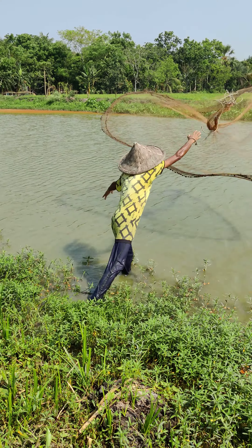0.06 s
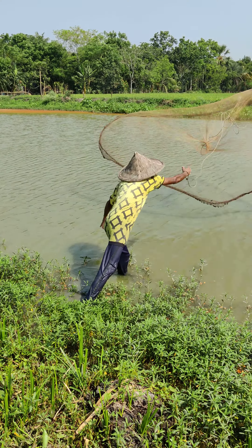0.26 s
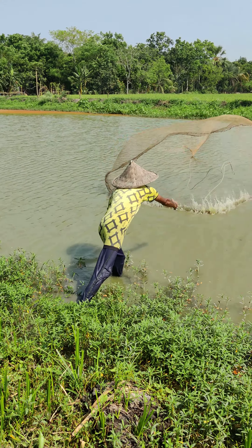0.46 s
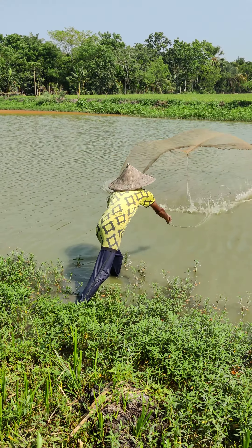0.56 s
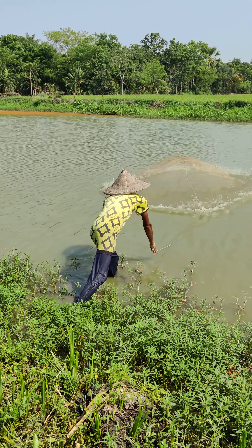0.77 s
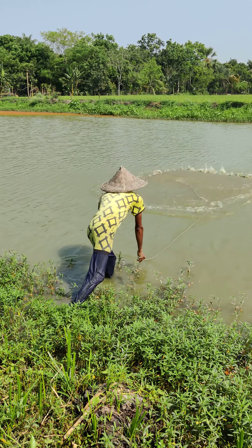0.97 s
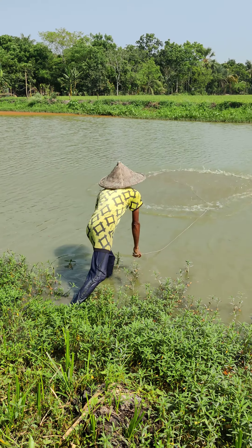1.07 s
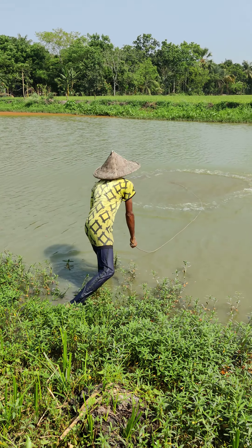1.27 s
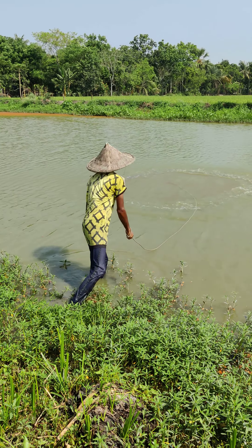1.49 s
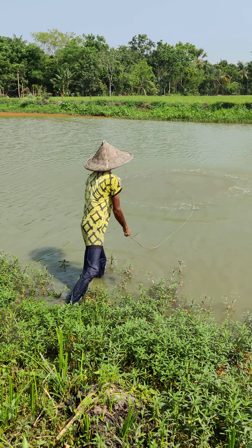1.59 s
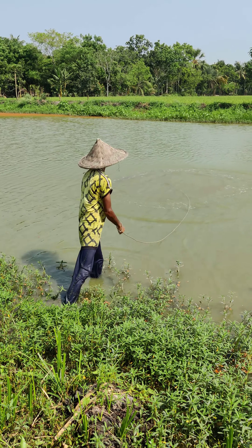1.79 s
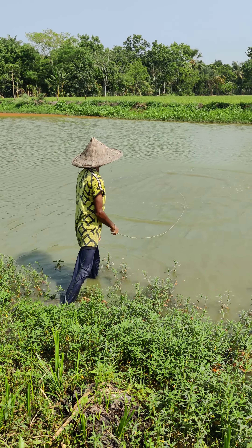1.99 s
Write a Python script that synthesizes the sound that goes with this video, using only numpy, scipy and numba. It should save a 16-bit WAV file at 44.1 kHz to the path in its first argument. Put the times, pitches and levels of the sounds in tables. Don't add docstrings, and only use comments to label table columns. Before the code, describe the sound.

A weighted cast net slaps onto pond water with a fizzing splash, wind thumping the microphone

```python
import sys
import numpy as np
from scipy import signal
from scipy.fft import rfft, irfft
from scipy.io import wavfile
from scipy.ndimage import uniform_filter1d
from numba import njit

SR = 44100
rng = np.random.default_rng(int(sys.argv[2]) if len(sys.argv) > 2 else 0)


def wrap_up_sound(samples):
    columns = np.atleast_2d(samples).T
    tamed = np.clip(columns, -1, 1)
    steps = np.round(tamed * 32767).astype(np.int16)
    wavfile.write(sys.argv[1], SR, steps)


def invert_db(x):
    u = np.asarray(x, float) / 20
    return 10 ** u


N = 90404
GLIDE = 0.17


def unit(x):
    return x / np.sqrt(np.mean(x ** 2))


@njit
def lowpass(x, edge_hz):
    y, band, low = np.empty(len(x)), 0., 0.
    for i in range(len(x)):
        g = np.tan(np.pi * edge_hz[i] / SR)
        v = (band + g * (x[i] - low)) / (1 + g * (g + 1.4))
        y[i] = low + g * v
        band, low = 2 * v - band, low + 2 * g * v
    return y


@njit
def ring(n, start, hz, cycles, size, glide, swell):
    y = np.zeros(n)
    for k in range(len(start)):
        span = int(cycles[k] * SR / hz[k])
        phase = 0.
        for j in range(min(2 * span, n - start[k])):
            now_hz = min(hz[k] * (1 + glide * j / span), .45 * SR)
            phase += 2 * np.pi * now_hz / SR
            attack = min(j / (swell * span + 1), 1.)
            y[start[k] + j] += size[k] * np.exp(-3. * j / span) * attack * np.sin(phase)
    return y


def colour(x, points, lag_s=0.):
    f, p = np.fft.rfftfreq(2048, 1 / SR), np.array(points, float)
    gain_db = np.interp(np.log(f + 1), np.log(p[:, 0]), p[:, 1])
    cepstrum = irfft(gain_db * np.log(10) / 20)
    cepstrum[1:1024] *= 2
    cepstrum[1025:] = 0
    impulse = irfft(np.exp(rfft(cepstrum) - 2j * np.pi * f * lag_s))
    return signal.fftconvolve(x, impulse)[:N]


def walk(rate_hz):
    k = int(SR / rate_hz)
    steps = rng.standard_normal(400)[np.arange(N) // k % 400]
    return 1.31 * uniform_filter1d(uniform_filter1d(steps, k), k)


def curve(table, col):
    p = np.array(table, float)
    return np.interp(np.arange(N) / SR, p[:, 0], p[:, col])


def swarm(per_s, cycles, scatter_db, mid_hz, octaves):
    c = rng.random((12000, 4))[:int(per_s * N / SR)].T
    start = (c[0] * N).astype(np.int64)
    hz = np.clip(mid_hz * 2 ** (octaves * (c[1] + c[2] - 1) * 2), 120, 15000)
    size = invert_db(-scatter_db * np.log(c[3] + 1e-4))
    return unit(ring(N, start, hz, cycles * (.5 + c[2]), size, GLIDE, 0.))


def singles(table, cycles, gain_db, swell=0.):
    p = np.array(table, float)
    start = (p[:, 0] * SR).astype(np.int64)
    return ring(N, start, p[:, 2].copy(), cycles + 0 * p[:, 0], invert_db(p[:, 1] + gain_db), GLIDE, swell)


# pitch_hz, level_db
FIELD_COLOUR = [(60, -8), (200, 17.5), (500, 12), (1500, 5.5), (5000, -1.5), (11000, 6.5), (13600, 1),
                (14600, -22), (15500, -22)]


def field():
    level_db, shared = -56.5, 0.38
    mid, left, right = (colour(rng.standard_normal(N), FIELD_COLOUR) for _ in range(3))
    return invert_db(level_db) * (np.sqrt(shared) * mid + np.sqrt(1 - shared) * np.array([left, right]))


# centre_s, half_length_s, depth_db
WIND_LULLS = [
    (0.186, 0.11, -10.5),
    (1.38, 0.018, -9),
]


def rumble(level_db, edge_hz):
    t = np.arange(N) / SR
    lull_db = sum(db * np.exp(-((t - s) / half) ** 2) for s, half, db in WIND_LULLS)
    noise = lowpass(rng.standard_normal(N), np.full(N, 1. * edge_hz))
    noise = lowpass(noise, np.full(N, 0.74 * edge_hz))
    return unit(noise) * invert_db(level_db + lull_db + 5.6 * walk(27.16))


def eddies(table):
    t, out = np.arange(N) / SR, np.zeros(N)
    for row, c in zip(table, rng.random((60, 2))):
        u = (t - row[0]) * row[2] * 2.884
        push = (1 - 2 * u ** 2 + (c[1] - .5) * u) * np.exp(-u ** 2)
        out += np.sign(c[0] - .5) * invert_db(row[1]) * push
    return out


# centre_s, peak_db, size_hz, flutter_db
LEFT_PORT_EDDIES = [(0.015, -18.5, 45, -39.5), (0.076, -29.5, 35.3, -45.5), (0.101, -30, 59.6, -62),
                    (0.311, -38, 79.4, -52), (0.35, -27, 41.5, -52), (0.39, -20.5, 45.7, -43.5),
                    (0.431, -8, 46.5, -35), (0.483, -27.5, 65, -45), (0.53, -21, 61.3, -39),
                    (0.621, -47, 79.4, -45), (0.666, -52, 65, -52), (0.754, -17.5, 45, -34.5),
                    (0.77, -12.5, 81, -39.5), (0.788, -9.5, 63.7, -31), (0.815, -49, 38, -37),
                    (0.873, -36, 61, -42.5), (0.916, -23, 45, -41), (0.95, -12, 33, -35),
                    (1.007, -17.5, 59, -36.5), (1.037, -20.5, 45, -50), (1.047, -13.5, 96, -31),
                    (1.07, -15.5, 110, -29), (1.087, -22, 85, -31), (1.112, -24.5, 64.5, -37.5),
                    (1.162, -19.5, 104, -32), (1.184, -33, 89, -34.5), (1.209, -20, 64, -53),
                    (1.24, -17.5, 57.6, -37.5), (1.274, -37, 55, -44), (1.299, -16.5, 45, -47),
                    (1.318, -28.5, 87, -36), (1.336, -18, 34.2, -61), (1.423, -25, 47.4, -46.5),
                    (1.457, -11, 58, -37), (1.48, -14.5, 37.8, -36.5), (1.496, -12.5, 94, -33.5),
                    (1.509, -16, 66.6, -34.5), (1.55, -6.5, 130, -27), (1.576, -11.5, 57, -41),
                    (1.593, -13.5, 34.4, -39), (1.604, -23, 140, -35), (1.619, -10, 116, -29.5),
                    (1.631, -13, 57, -27.5), (1.65, -13, 67, -35), (1.686, -17.5, 54.6, -38),
                    (1.708, -16, 82, -36), (1.76, -12.5, 35.3, -50), (1.775, -10, 43, -33.5),
                    (1.791, -10.5, 52.6, -35.5), (1.822, -17, 89, -29.5), (1.836, -13.5, 38, -37),
                    (1.87, -21, 25.8, -56), (1.9, -22, 68.6, -38), (1.935, -27, 50, -39),
                    (1.976, -25.5, 45, -44.5)]


def left_gusts():
    flutter_s, gain_db, mid_hz, oct_per_db = .012, 7, 183.4, .045
    t = np.arange(N) / SR
    power = sum(invert_db(2 * db) * np.exp(-((t - s) / flutter_s) ** 2) for s, _, _, db in LEFT_PORT_EDDIES)
    gust_db = 10 * np.log10(power + invert_db(-120)) + 1.5 * walk(60.57)
    edge_hz = np.clip(mid_hz * 2 ** (oct_per_db * (gust_db + 30)), 40, 600)
    fine = rng.standard_normal(N)
    fine = fine - lowpass(fine, np.full(N, 50.))
    fine = lowpass(lowpass(fine, edge_hz), 0.97 * edge_hz)
    fine = fine * np.sqrt(SR / 2 / edge_hz)
    return eddies(LEFT_PORT_EDDIES) + fine * invert_db(gust_db + gain_db)


# centre_s, peak_db
RIGHT_PORT_EDDIES = [(0.058, -26), (0.114, -32), (0.223, -26), (0.343, -35), (0.393, -34), (0.47, -31),
                     (0.591, -28), (0.646, -28), (0.681, -35), (0.71, -30), (1.205, -36), (1.508, -33),
                     (1.565, -25), (1.594, -32), (1.641, -32), (1.712, -27)]


def wind():
    size_hz = 32
    right = [(s, db, size_hz) for s, db in RIGHT_PORT_EDDIES]
    return np.array([left_gusts() + rumble(-30, 50), eddies(right) + rumble(-36.5, 45)])


# time_s, level_db
SWISH_LEVEL = [
    (0, -41.5),
    (.03, -67),
    (.085, -63),
    (.11, -69),
    (.16, -61.5),
    (.26, -62.5),
    (.4, -63.5),
    (.45, -99),
]


def swish():
    tone = [(150, 35.5), (400, 21), (1200, 5.5), (5000, -5), (8500, 17), (12000, 8.5), (15000, 1)]
    return colour(rng.standard_normal(N), tone) * invert_db(curve(SWISH_LEVEL, 1) + walk(47))


def drops(table, pitch_hz, cycles, gain_db):
    tick_hz, tick_db = 11200, -10
    c = rng.standard_normal((40, 2))
    rings = [(s, db, pitch_hz * (1 + 0.056 * v[0])) for (s, db), v in zip(table, c)]
    ticks = [(s, db, tick_hz * (1 + .1 * v[1])) for (s, db), v in zip(table, c)]
    return singles(rings, cycles, gain_db) + singles(ticks, 2.8, gain_db + tick_db)


# start_s, peak_db
FLIGHT_DROPS = [(0.0034, -40), (0.0134, -40), (0.0234, -47), (0.0294, -49), (0.0533, -46), (0.0604, -45),
                (0.1094, -51), (0.1436, -46), (0.1514, -47), (0.1955, -51), (0.2074, -51), (0.2458, -46),
                (0.2723, -39), (0.2907, -47), (0.3346, -46), (0.3576, -45)]


def net_drops():
    return drops(FLIGHT_DROPS, pitch_hz=5760, cycles=10, gain_db=8)


# start_s, peak_db
WATER_DROPS = [(0.407, -27), (0.4364, -24), (0.4753, -26), (1.045, -33), (1.0779, -35), (1.1194, -34),
               (1.1972, -41), (1.2456, -42), (1.3334, -48), (1.4112, -44), (1.4287, -47), (1.7305, -48)]


def pond_drops():
    return drops(WATER_DROPS, pitch_hz=4870, cycles=30, gain_db=-1)


# start_s, peak_db, pitch_hz
LARGE_BUBBLES = [(0.52, -28, 708), (0.542, -28, 697), (0.562, -29, 835), (0.58, -37, 940),
                 (0.609, -27.5, 702), (0.671, -28.5, 647), (0.787, -23.5, 806), (0.818, -31.5, 860),
                 (0.865, -29.5, 654), (0.88, -30, 1140), (1.129, -35, 1240), (1.264, -37.5, 723),
                 (1.318, -46, 580), (1.447, -39.5, 824)]


def bubbles():
    return singles(LARGE_BUBBLES, cycles=17.5, gain_db=1, swell=.12)


# start_s, peak_db, pitch_hz
AIR_GULPS = [
    (.50, -28, 227),
    (.535, -23.5, 215),
    (.675, -28, 301),
    (.79, -26, 342),
    (.86, -29.5, 340),
    (1.0, -29, 298),
    (1.448, -33.5, 481.5),
]


def gulps():
    return singles(AIR_GULPS, cycles=9.9, gain_db=0, swell=0.21)


# start_s, peak_db, pitch_hz
WEIGHT_SLAPS = [
    (.4068, -30, 3670),
    (.4075, -35, 5400),
    (.7515, -33, 4300),
    (.763, -29, 4450),
    (.771, -27, 3820),
]


def slaps():
    return singles(WEIGHT_SLAPS, cycles=17, gain_db=0)


# time_s, spray_db, big_bubble_db, fine_mist_db
RIM_SPRAY = [
    (0.406, -62, -24, 16),
    (0.412, -46, -12, 9),
    (0.431, -44.5, -4, 13),
    (.455, -45.5, -23, 8.5),
    (0.51, -37, 5, -0.5),
    (.56, -40.5, 8, 2),
    (.605, -36.5, -2, -3),
    (.65, -41, -4, -0.5),
    (0.692, -40.5, 4, 0),
]
# time_s, spray_db, big_bubble_db, fine_mist_db
MESH_SPRAY = [(0.735, -44, 5.5, 1.5), (0.757, -41.5, -19, 8), (0.773, -36.5, 3, 5.5),
              (.805, -35.5, 0.5, -10.5), (0.839, -39.5, 1.5, -11), (.99, -46.5, 1.5, -4.5),
              (1.051, -46.5, 6, 2.5), (1.13, -47.5, -3.5, -8.5), (1.2, -51, -10, -7.5),
              (1.285, -52.5, -5, -11), (1.32, -58.5, 2.5, -5), (1.57, -69.5, 6, 5)]


def splash():
    before = [(RIM_SPRAY[0][0] - .01, -90, 0, 0)]
    after = [(MESH_SPRAY[-1][0] + 0.45, -85, 0, 0)]
    table = before + RIM_SPRAY + MESH_SPRAY + after
    spray_db = curve(table, 1) + walk(39.96)
    fizz = invert_db(3.5) * swarm(per_s=5000, cycles=7.3, scatter_db=1.5, mid_hz=3034, octaves=1.321)
    plops = swarm(per_s=500, cycles=9.1, scatter_db=2, mid_hz=763, octaves=0.624)
    plops = plops * invert_db(-1.5 + curve(table, 2))
    tone = [(300, -21), (2000, -7.5), (8000, 0.5), (13000, -3), (15500, -16)]
    mist = colour(rng.standard_normal(N), tone)
    mist = mist * invert_db(6.5 + curve(table, 3) + 1.4 * walk(34.55))
    return invert_db(spray_db) * (fizz + plops + mist)


# pitch_hz, level_db
WIDTH_COLOUR = [(400, -1.5), (2500, 0), (6000, 1.5), (9000, 5.5), (15000, 10)]


def wide_splash():
    spread = 0.27
    return spread * colour(splash(), WIDTH_COLOUR) * np.array([[1], [-1]])


# pitch_hz, level_db
LEFT_COLOUR = [(150, -11.5), (900, -2.5), (3000, -2.5), (5200, -2), (6400, 5.5), (7300, -11), (9500, -13.5),
               (15000, -21)]
# pitch_hz, level_db
RIGHT_COLOUR = [(150, -11), (900, -5), (2500, -1), (4600, 7), (5900, 5.5), (7000, -17), (10500, -20),
                (15000, -3.5)]


def ports(air):
    right_lag_s = .00005
    return np.array([colour(air[0], LEFT_COLOUR), colour(air[1], RIGHT_COLOUR, right_lag_s)])


def scene():
    centre = swish() + net_drops() + pond_drops() + bubbles() + gulps() + slaps() + splash()
    return ports(centre + wide_splash() + field()) + wind()


def band_limit(x):
    return signal.sosfilt(signal.butter(12, 15750, fs=SR, output="sos"), x)


def record(dry):
    x = signal.sosfilt(signal.butter(2, 16, "high", fs=SR, output="sos"), dry)
    x = signal.sosfilt(signal.ellip(10, .2, 60, 15650, fs=SR, output="sos"), x)
    return band_limit(x)


dry = scene()
out = record(dry)
wrap_up_sound(out)
```